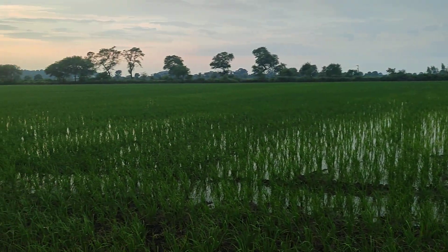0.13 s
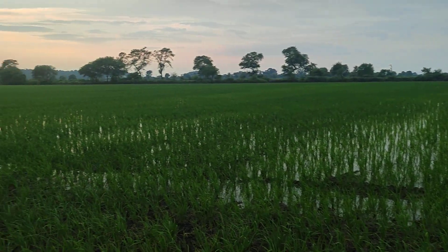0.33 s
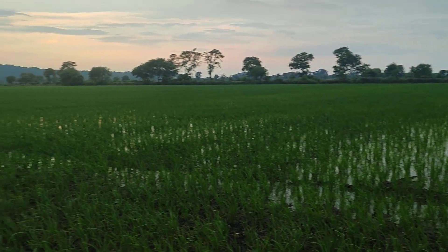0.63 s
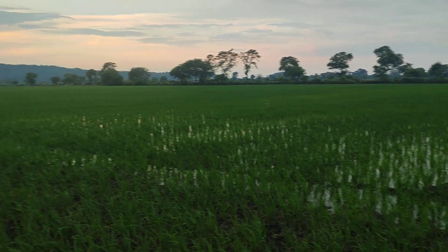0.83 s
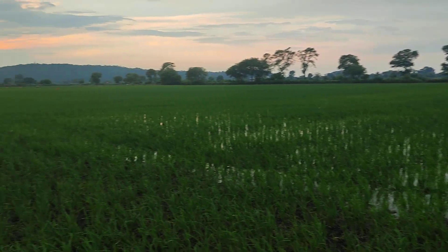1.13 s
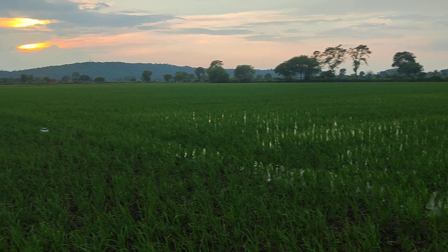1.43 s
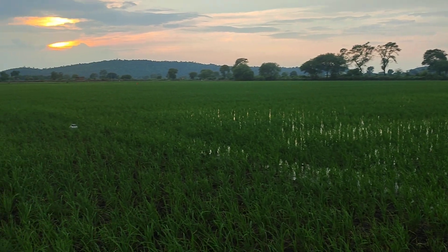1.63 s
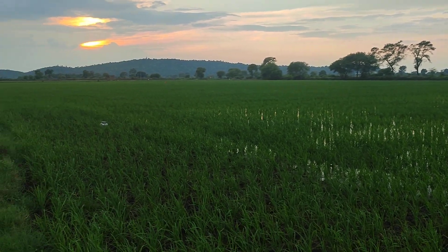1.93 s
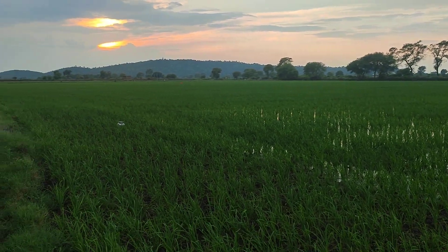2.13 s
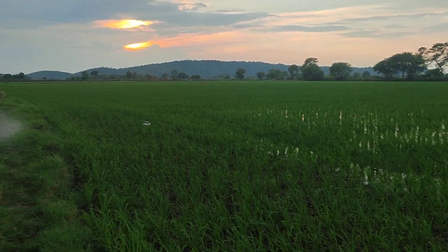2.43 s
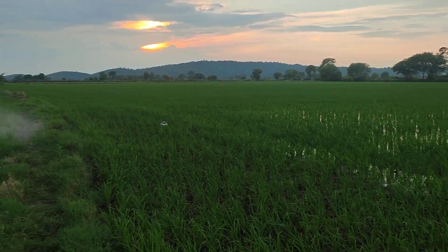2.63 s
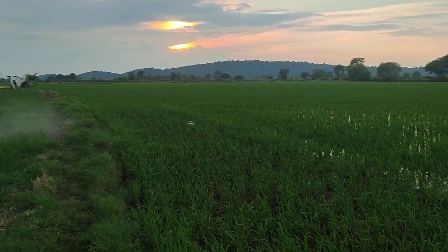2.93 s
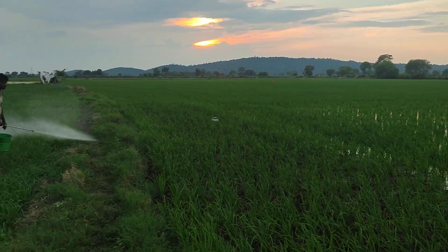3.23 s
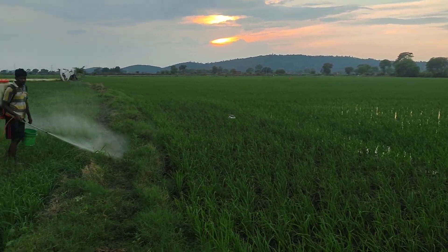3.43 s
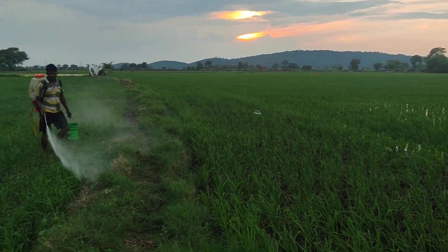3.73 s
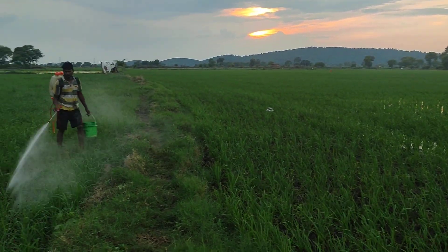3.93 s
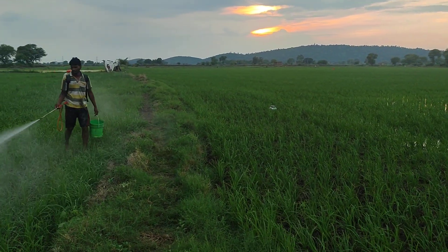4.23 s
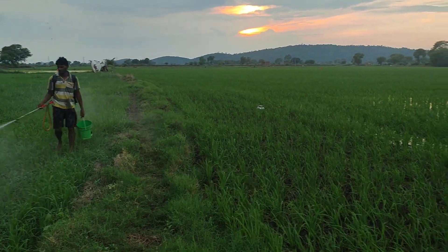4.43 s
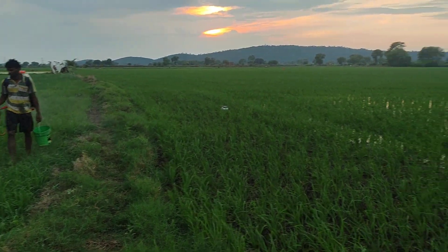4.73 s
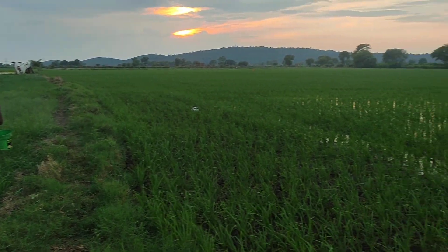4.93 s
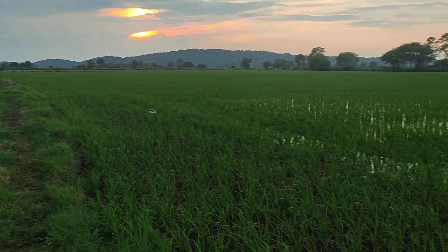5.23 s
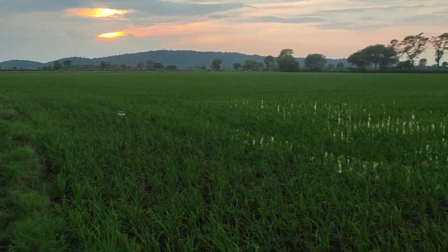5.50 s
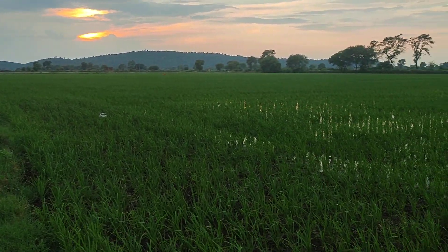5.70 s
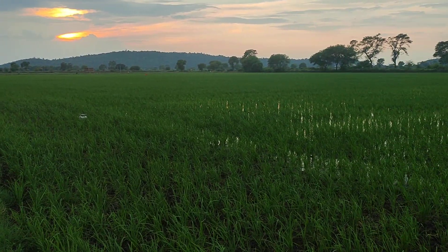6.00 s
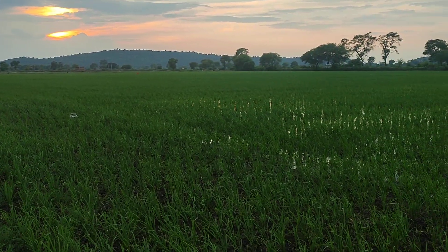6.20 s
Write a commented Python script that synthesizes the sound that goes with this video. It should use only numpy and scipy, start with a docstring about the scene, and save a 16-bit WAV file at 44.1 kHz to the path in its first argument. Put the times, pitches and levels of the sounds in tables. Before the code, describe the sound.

A hand-held stereo microphone in a breezy field catches a small engine's fast, rough purr and the fluttering hiss of its spray, with a faint metallic whine. Soft wind builds into low, blunt thumps and rumbling gusts, heaviest on the right. The spray dims past the middle and comes back weaker, over a thin, even background hiss.

```python
"""On a rice field at dusk, wind buffets a hand-held camera that pans; a thin, even hiss lies over the fields.
A farmer works a crop sprayer, heard first at the left port: engine pulses chug through their silencer,
valve knocks rasp and ring the casing, the pump whistles, and noise gated by its strokes is the jet's hiss.
The hiss fades as the jet swings away and partly returns. Shaped noise makes the rising breeze, its gusts
and brief lulls, mostly at the right port; rounded pressure peaks are the single thumping eddies."""
import sys
import numpy as np
from scipy import signal
from scipy.fft import rfft, irfft
from scipy.io import wavfile
from scipy.ndimage import uniform_filter1d, map_coordinates

SR = 44100
rng = np.random.default_rng(int(sys.argv[2]) if len(sys.argv) > 2 else 0)


def master_out(mix):
    """Clip the mix to full scale and print it as 16-bit PCM to the path in sys.argv[1]."""
    frames = np.transpose(np.atleast_2d(mix))
    ceiling = np.clip(frames, -1, 1)
    pcm = np.round(ceiling * 32767).astype(np.int16)
    wavfile.write(sys.argv[1], SR, pcm)


N = 280520
TIME, HZ = np.arange(N) / SR, np.fft.rfftfreq(N, 1 / SR)


def gain_of(db):
    """Logarithmic level: decibels to amplitude."""
    return 10 ** (np.asarray(db) / 20)


def evened(x):
    """Normalisation: scales each channel to rms 1."""
    return x / np.sqrt(np.mean(x ** 2, axis=-1, keepdims=True) + 1e-20)


def curves(rows):
    """Linear interpolation: each column of a time table, sample by sample."""
    s, *columns = np.transpose(rows)
    return [np.interp(TIME, s, column) for column in columns]


def coloured(x, points):
    """Linear filtering: applies a spectrum drawn on a log-frequency axis."""
    f, db = np.transpose(points)
    spectrum_db = np.interp(np.log(HZ + 1), np.log(f + 1), db)
    return irfft(rfft(x) * gain_of(spectrum_db), N)


def noise(channels=2):
    """Incoherence: white noise, unrelated between channels."""
    return rng.standard_normal((channels, N))


def wander(rate_hz, channels=1):
    """Low-passed randomness: smooth chance of rms 1 up to about the given rate."""
    return evened(irfft(rfft(noise(channels)) / (1 + (HZ / rate_hz) ** 4), N))


def panned(side_db):
    """Constant-power panning: gains of the left and right ports."""
    left = gain_of(side_db)
    return np.array([left, np.ones(N)]) * np.sqrt(2 / (1 + left ** 2))


# the camera pans: (time [s], lag of the right port [ms], left minus right level of the spray [dB])
CAMERA_HEADING = [(0, 0.48, -7), (1, .53, -5.5), (2, 0.51, -4.5), (3, 0.45, -4.5), (3.7, 0.35, -2.5),
                  (4.5, 0.33, -8), (5.2, 0.37, -8), (6.36, 0.54, -3)]


def arriving(direct, scattered, share, shorter_ms=0):
    """Interaural delay and diffusion: direct sound lags at the right port; crop scatter is unrelated there."""
    lag_ms, _ = curves(CAMERA_HEADING)
    delayed_samples = np.arange(N) - (lag_ms - shorter_ms) * SR / 1000
    late = map_coordinates(direct, [delayed_samples], order=3, mode="nearest")
    return np.sqrt(1 - share) * np.array([direct, late]) + np.sqrt(share) * scattered  # share of the power


def cycles(table, first_s):
    """Phase is the integral of speed: cycles run so far, zero near first_s."""
    per_s, = curves(table)
    return np.cumsum(per_s) / SR - first_s * per_s[0]


def clicks(turns, at):
    """Impulse train: one click each cycle, at the given share of the cycle."""
    return np.diff(np.floor(turns - at), prepend=np.floor(turns[0] - at))


def beats(turns, uneven_db, length):
    """Exponential decay: one puff a cycle, each of its own size; length is a share of the cycle."""
    cycle = (turns - turns.min() // 1).astype(int)
    size_db = uneven_db * rng.standard_normal(cycle[-1] + 1)
    return evened(gain_of(size_db[cycle]) * np.exp(-(turns % 1) / length))


def smeared(x, ms_per_khz):
    """Dispersion: higher partials leave later, which spreads each pulse but keeps the harmonics even."""
    return irfft(rfft(x) * np.exp(-1j * np.pi * ms_per_khz * (HZ / 1000) ** 2), N)


# hiss of the open fields: (frequency [Hz], spectral density [dB per Hz])
FIELD_SPECTRUM = [(100, 7), (400, -2.5), (700, -0.5), (900, -28), (1300, -13.5), (1800, 6.5), (2700, 4),
                  (4000, 6), (4850, 0.5), (6000, 0), (8000, -2), (10000, -7.5), (11000, -4.5),
                  (14000, -8.5)]


def field():
    """Stationary noise: the even, distant hiss of the open fields."""
    return gain_of(-39) * evened(coloured(noise(), FIELD_SPECTRUM))


# the breeze between gusts at the windward (right) port: (time [s], force [dB])
BREEZE_FORCE = [(0, -42), (.55, -43), (1, -33), (1.33, -26.5), (1.6, -28), (2.32, -27.5), (3.05, -20.5),
                (3.92, -21), (4.35, -22), (4.62, -33.5), (4.95, -29.5), (5.2, -18.5), (5.45, -22),
                (5.56, -23.5), (6.36, -22)]
# gusts: (start [s], length [s], force [dB], left minus right [dB],
# fineness [dB]: above 0 small eddies, below 0 large ones)
GUST_EVENTS = [(-.02, 0.022, -26.5, 3, -1.5), (.24, 0.022, -43, 5, -7), (.89, 0.22, -32, -4, 8.5),
               (1.14, 0.096, -37, -1, -4), (1.42, 0.075, -27.5, -11, 8.5), (1.7, .3, -33, -10, 14.5),
               (2.06, 0.21, -29, -8, 8.5), (2.378, 0.24, -29.5, -11, 13), (2.62, 0.19, -25, -15, 7.5),
               (3.229, 0.16, -15, -27, -2), (3.35, 0.034, -24, -26, 14), (3.5, 0.047, -26, 2, -7),
               (3.699, 0.059, -19.5, -3, 0), (3.998, 0.13, -18, -4.5, 0), (4.44, 0.099, -39, 12.5, -0.5),
               (4.859, 0.014, -16.5, -27, -3.5), (4.985, 0.057, -14.5, -25, 2),
               (5.26, 0.092, -25.5, -2.5, -7), (5.627, 0.41, -18.5, -17, 3.5),
               (6.0, 0.12, -20.5, -28.5, 5.5), (6.16, 0.094, -24, -3.5, -3.5)]
GUST_ATTACK_S, GUST_RELEASE_S = 0.0081, 0.04
USUAL_FORCE_DB = -26
LEE_DB, LEE_FOLLOWS = -32, 0.41  # left port at the usual force; dB gained per dB of breeze


def force(fine):
    """Power addition: breeze plus gusts at both ports, in dB over the usual; fine runs from -1 (large) to 1."""
    breeze_db, = curves(BREEZE_FORCE)
    lee_db = LEE_DB + LEE_FOLLOWS * (breeze_db - USUAL_FORCE_DB)
    power = gain_of([lee_db, breeze_db]) ** 2
    for start, length, force_db, side_db, fine_db in GUST_EVENTS:
        rise = np.clip((TIME - start) / GUST_ATTACK_S, 0, 1)
        fall = np.exp(-np.clip(TIME - start - length, 0, 1) / GUST_RELEASE_S)
        gust = gain_of(force_db + fine * fine_db) * rise * fall
        power = power + (gain_of([[side_db], [0]]) * gust) ** 2
    return 10 * np.log10(power) - USUAL_FORCE_DB


# eddies from large to small, each: (frequency [Hz], spectral density [dB per Hz])
HEAVE_SPECTRUM = [(8, -24), (20, 1), (33, 6), (50, 0.5), (70, -3.5), (120, -72), (300, -45.5)]
RUMBLE_SPECTRUM = [(20, -21), (45, -3), (62, -1.5), (100, -1.5), (150, -4.5), (190, -10.5), (260, -18.5),
                   (400, -57), (900, -61)]
FLUTTER_SPECTRUM = [(40, -35), (110, -1.5), (190, 1.5), (300, -7.5), (450, -14), (700, -30.5),
                    (1200, -31.5), (3000, -62), (9000, -83)]
# brief changes of wind at the right port, mostly drops: (time [s], half-length [s], level change [dB])
LULL_EVENTS = [(1.29, 0.052, -12), (2.295, 0.026, -2), (3.007, .025, -2), (3.44, 0.012, 2),
               (3.628, .03, -9), (3.943, 0.043, -11), (4.27, 0.025, 2.5), (4.352, 0.011, -16),
               (4.936, 0.027, -7), (5.233, 0.035, -7.5), (5.548, 0.028, -8), (5.955, 0.033, -6.5)]
# eddy sizes: (level at the usual force [dB], gain per dB of force [dB])
HEAVE_LAW, RUMBLE_LAW, FLUTTER_LAW = (-25.5, 0.88), (-27.5, 1.03), (-36.5, 1.19)
TURBULENCE_HZ, RUMBLE_SWING_DB, FLUTTER_SWING_DB = 14, 1.5, 2.3


def wind():
    """Turbulent cascade: each port feels its own eddies; small ones ride on the pressure peaks of large ones."""
    heave_db, rumble_db, flutter_db = (
        db + slope * force(fine)
        for fine, (db, slope) in [(-1, HEAVE_LAW), (0, RUMBLE_LAW), (1, FLUTTER_LAW)])
    right_db = sum(db * np.exp(-((TIME - s) / half) ** 2) for s, half, db in LULL_EVENTS)
    lull_db = np.array([[0], [1]]) * right_db
    turbulence = wander(TURBULENCE_HZ, channels=2)
    # the gust speed bounds the pressure swings
    heave = evened(np.tanh(.5 * evened(coloured(noise(), HEAVE_SPECTRUM))))
    large = evened(np.tanh(.5 * evened(coloured(noise(), RUMBLE_SPECTRUM))))
    riding = gain_of(1.3 * large + wander(52, channels=2))
    small = evened(coloured(noise(), FLUTTER_SPECTRUM) * riding)
    heave_gain = gain_of(heave_db + .5 * lull_db)
    rumble_gain = gain_of(rumble_db + lull_db + heave + RUMBLE_SWING_DB * turbulence)
    flutter_gain = gain_of(flutter_db + lull_db + FLUTTER_SWING_DB * turbulence)
    return heave_gain * heave + rumble_gain * large + flutter_gain * small


# the sprayer as its lance swings: (time [s], jet hiss [dB], casing clatter [dB]), both relative
LANCE_LEVELS = [(0, -34, -45), (0.75, -34, -49.5), (1.2, -33.5, -35), (2.0, -34, -34), (2.65, -33.5, -36.5),
                (3.4, -38.5, -35.5), (4.0, -46, -47), (4.5, -55.5, -68), (5.1, -55, -42.5),
                (5.7, -47.5, -41.5), (6.36, -42.5, -37)]
FACING_DB = -34  # table level of the jet when it faces the camera
JET_DB, FIZZ_DB, CASING_DB = -27.5, -33.5, 1  # hiss and fizz when facing; offset of the casing
HISS_FALL, FIZZ_FALL = 1.01, 0.81  # dB per dB of the jet's swing


def spraying():
    """Directivity: levels of casing clatter, jet hiss and droplet fizz in dB as the lance swings."""
    jet_db, casing_db = curves(LANCE_LEVELS)
    away_db = jet_db - FACING_DB
    return casing_db + CASING_DB, JET_DB + HISS_FALL * away_db, FIZZ_DB + FIZZ_FALL * away_db


def gated_hiss(gate, spectrum, scatter):
    """Amplitude modulation: noise opened by a gate and coloured, as it arrives from the machine."""
    sound = evened(coloured(noise(channels=3) * gate, spectrum))
    return arriving(sound[0], sound[1:], scatter)


# casing, jet and droplets, each: (frequency [Hz], spectral density [dB per Hz])
CLATTER_SPECTRUM = [(900, -51), (1250, -8), (1480, 9), (1680, 14), (1900, 7), (2150, 8), (2400, 4),
                    (2800, -45), (4000, -44)]
JET_SPECTRUM = [(1500, -13.5), (2300, 1), (2600, 1), (3100, 6), (3400, -3.5), (3900, 0.5), (4400, -0.5),
                (4850, -3), (5400, 1), (6000, -0.5), (6550, -18), (7200, -20), (9000, -85)]
FIZZ_SPECTRUM = [(4500, -49), (6300, 0), (7500, 3), (8500, -3), (9400, -1.5), (10200, -13), (10900, 2),
                 (12000, -18), (14300, -14)]
JET_SURGE, CLATTER_SURGE, FIZZ_SURGE = .35, .12, .38  # depth of the pump strokes


def sprayer(engine_turns, strokes):
    """Modulated turbulence: casing clatters with the firings; jet and droplets surge at every pump stroke."""
    clatter_db, hiss_db, fizz_db = spraying()
    knocks = beats(engine_turns - .38, uneven_db=1.5, length=.12)
    surges = beats(strokes, uneven_db=1.4, length=.12)
    sputter = gain_of(1.5 * wander(36)[0])
    clatter = gated_hiss(1 + .4 * knocks + CLATTER_SURGE * surges, CLATTER_SPECTRUM, scatter=.18)
    hiss = gated_hiss(1 + JET_SURGE * surges + .15 * knocks, JET_SPECTRUM, scatter=.2)
    fizz = gated_hiss(sputter * (1 + FIZZ_SURGE * surges), FIZZ_SPECTRUM, scatter=.48)
    return clatter * gain_of(clatter_db) + hiss * gain_of(hiss_db) + fizz * gain_of(fizz_db)


# four valve knocks in each engine cycle: (share of the cycle [1], ring [dB], rasp [dB])
VALVE_KNOCKS = [(.147, -7, -3), (.413, -3, 0), (.68, 0, -3), (.947, -16, -2)]
# resonance of the casing near 2.1 kHz: (frequency [Hz], level [dB])
RING_SPECTRUM = [(1750, -39), (1960, -35), (2060, 8), (2140, -0.5), (2200, 7), (2290, -13.5), (2450, -32)]
# loudness of that resonance: (time [s], level [dB])
RING_LEVEL = [(0, -44), (.3, -35.5), (.75, -30), (1.1, -33), (1.4, -67), (2.1, -57), (2.7, -38),
              (3.25, -32.5), (3.7, -37.5), (4.3, -48.5), (4.8, -51), (5.5, -40.5), (6.36, -44.5)]
# dry rasp of the valves: (frequency [Hz], level [dB])
RASP_SPECTRUM = [(1200, -30), (1420, 3), (1900, -37), (2500, 3), (3000, -3.5), (3500, 6.5), (4300, -15),
                 (4900, -4), (6500, -10)]
RASP_UNDER_JET_DB, RASP_DECAY_S, RASP_DRIFT_HZ = -7.5, .0013, .35


def valves(turns):
    """Impact excitation: knocks ring the casing into a whine and rasp, in a colour that drifts as the farmer moves."""
    impacts = sum(gain_of(db) * clicks(turns, at) for at, db, _ in VALVE_KNOCKS)
    ring = evened(coloured(impacts, RING_SPECTRUM))
    decay = np.exp(-TIME[TIME < 6 * RASP_DECAY_S] / RASP_DECAY_S)
    drift, rasp = 2 * np.pi * RASP_DRIFT_HZ * TIME, 0
    for at, _, db in VALVE_KNOCKS:
        knocks = clicks(turns, at) * gain_of(db + 1.5 * rng.standard_normal(N))
        for blend in np.cos(drift), np.sin(drift):  # crossfades two random responses
            response = decay * rng.standard_normal(len(decay))
            rasp = rasp + signal.oaconvolve(knocks * blend, response)[:N]
    ring_db, = curves(RING_LEVEL)
    _, hiss_db, _ = spraying()
    rasp = evened(coloured(rasp, RASP_SPECTRUM)) * gain_of(hiss_db + RASP_UNDER_JET_DB)
    return arriving(ring * gain_of(ring_db) + rasp, 0, share=0)


# whistles of the pump: (frequency [Hz], relative level [dB])
PUMP_WHISTLES = [(1957, -7.5), (2272, 7.5), (2808, 4), (3951, -0.5), (4278, 2)]


def whistles(strokes):
    """Additive synthesis: thin pump tones drift together, flicker one by one and throb with the jet."""
    clock = TIME + .0022 * np.cumsum(wander(2.56)[0]) / SR
    lines = 0
    for hz, db in PUMP_WHISTLES:
        flicker = 1 + .5 * wander(29)[0]
        lines = lines + gain_of(db) * flicker * np.cos(2 * np.pi * (hz * clock + rng.random()))
    _, hiss_db, _ = spraying()
    throb = evened(1 + .7 * beats(strokes, uneven_db=1.5, length=.25))
    return arriving(lines, 0, share=0) * throb * gain_of(hiss_db - 15)


# the exhaust: (time [s], thrum [dB], growl [dB], bark [dB], ring of the pipe [dB])
EXHAUST_LEVELS = [(0, -40.5, -44.5, -46, -68), (.9, -38, -42, -63, -50.5), (1.5, -35.5, -45.5, -50, -46.5),
                  (2.0, -35.5, -47, -44.5, -42.5), (2.6, -51, -48, -39.5, -42.5),
                  (3.2, -49, -47.5, -41, -44), (4.5, -44.5, -56, -46.5, -55), (5, -37, -63, -41, -52),
                  (5.6, -54, -54, -39.5, -47), (6.36, -53, -52, -40, -50)]
# parts of the exhaust, each: (frequency [Hz], level [dB])
THRUM_SPECTRUM = [(35, 2), (82, 18.5), (122, 3), (163, 3), (204, 14.5), (245, 5), (290, -9), (400, -25),
                  (600, -53)]
GROWL_SPECTRUM = [(380, -37), (450, -12), (490, 13), (570, 4), (620, 16), (690, 8.5), (760, 4), (850, -11),
                  (950, -45)]
BARK_SPECTRUM = [(560, -65), (690, -13), (740, 4.5), (830, 4), (930, 9), (1020, 3), (1200, -17.5),
                 (1450, -3.5), (1900, -7.5), (3000, -30.5)]
PIPE_SPECTRUM = [(880, -62), (970, -5), (1040, 22), (1100, 7.5), (1200, -27.5)]
# echoes off the bank and the wet ground: (delay [ms], level [dB])
EXHAUST_ECHOES = [(2.6, -15), (7.5, -12), (17.5, -11)]


def engine(turns):
    """Source and filter: firing pulses become thrum, growl, bark near 800 Hz and pipe ring, plus gas noise."""
    thrum_db, growl_db, bark_db, pipe_db = curves(EXHAUST_LEVELS)
    pulses = clicks(turns, at=.05) * gain_of(1.5 * wander(22)[0])
    # the echoes soften the gaps between firings
    pulses = pulses + sum(gain_of(db) * np.roll(pulses, round(ms * SR / 1000)) for ms, db in EXHAUST_ECHOES)
    blended, sharp = smeared(pulses, ms_per_khz=55), smeared(pulses, ms_per_khz=9)
    parts = [(blended, THRUM_SPECTRUM, thrum_db), (blended, GROWL_SPECTRUM, growl_db),
             (sharp, BARK_SPECTRUM, bark_db), (sharp, PIPE_SPECTRUM, pipe_db)]
    chug = sum(evened(coloured(x, spectrum)) * gain_of(db) for x, spectrum, db in parts)
    gas = noise() * beats(turns, uneven_db=0.5, length=0.99)
    bark_gas = evened(coloured(gas, BARK_SPECTRUM)) * gain_of(bark_db)
    pipe_gas = evened(coloured(gas, PIPE_SPECTRUM)) * gain_of(pipe_db)
    return arriving(chug, bark_gas + pipe_gas, share=.12, shorter_ms=.02)


# single eddies that strike the ports:
# (time [s], low thump [dB], slap [dB], rustle [dB], left minus right [dB])
EDDY_STRIKES = [(0.026, -20, -37, -52, 4), (0.884, -25, -31, -59, -10), (1.035, -18, -27, -51, -21),
                (1.165, -30, -26, -59, -2), (1.241, -20, -31, -55, 17), (1.45, -14, -27.5, -57, -6),
                (1.841, -24, -22, -48, -4), (1.945, -22, -21, -36, -6), (2.08, -19, -22.5, -47.5, -13),
                (2.19, -12, -26, -50, -19), (2.233, -18, -19, -46, -20), (2.53, -18, -32, -50, -2),
                (2.568, -11, -23, -44, 1), (2.691, -20, -16.5, -36, -32), (2.859, -10, -23, -54, -20),
                (3.036, -15, -28, -47, -10), (3.268, -17, -26, -48, -20), (3.359, -28, -18, -25, -29),
                (3.399, -13.5, -24.5, -48, -22), (3.489, -11, -17.5, -46, -20), (3.517, -3, -32, -50, -18),
                (3.566, -28, -18.5, -31, -9.5), (3.622, -12.5, -21, -50, 12), (3.725, -21, -26.5, -48, -22),
                (3.764, -13, -28, -52, 12), (3.902, -21, -28, -57, -12), (4.027, -12, -20, -22, -13),
                (4.073, -19, -9, -18.5, -14), (4.119, -3.5, -39, -50, -8), (4.197, -8, -20.5, -42, -10),
                (4.311, -21, -18.5, -24, -16), (4.385, -6, -23, -40, -18), (4.431, -16, -38, -55, 16),
                (4.559, -18, -36, -55, 7), (4.737, -12.5, -32.5, -56, 14), (4.889, -9, -21.5, -45, -23),
                (4.999, -7, -17.5, -36, -33), (5.02, -9, -14.5, -52, -24), (5.12, -9.5, -16, -32, -26),
                (5.71, -4, -17.5, -49, -16), (5.787, -5, -15, -52, -22), (5.863, -14, -28, -44, -18),
                (6.013, -8, -33, -54, -33), (6.042, -21, -34, -58, -22), (6.115, -8, -13, -32, -23),
                (6.134, -20, -15, -34, -21), (6.166, -11, -18, -29, -4), (6.245, -12, -24, -50, -15)]
# small eddies of a strike, each: (frequency [Hz], spectral density [dB per Hz])
SLAP_SPECTRUM = [(90, -15), (200, 8.5), (320, -0.5), (480, -10.5), (700, -27)]
RUSTLE_SPECTRUM = [(350, -1), (520, 3), (700, -5.5), (900, -14.5), (1300, -20), (2000, -22), (5000, -55)]
THUMP_S, SLAP_S = .0048, .0095


def buffets():
    """Vortex impact: a rounded pressure peak, opposite lobes either side, with a slap and a rustle on top."""
    # the eddy's speed bounds the pressure
    slaps = evened(np.tanh(2 * evened(coloured(noise(), SLAP_SPECTRUM))))
    slaps = evened(coloured(slaps, [(500, 0), (800, -12), (1400, -30), (4000, -60)]))
    rustle = evened(coloured(noise(), RUSTLE_SPECTRUM))
    out = np.zeros((2, N))
    for s, thump_db, slap_db, rustle_db, side_db in EDDY_STRIKES:
        near = np.flatnonzero(abs(TIME - s) < 4 * SLAP_S)
        t = TIME[near] - s
        thump = (1 - 2 * (t / THUMP_S) ** 2) * np.exp(-(t / THUMP_S) ** 2)
        thump = gain_of(thump_db) * thump * rng.choice([-1, 1], (2, 1))  # either sign at each port
        burst = gain_of(slap_db) * slaps[:, near] + gain_of(rustle_db) * rustle[:, near]
        ports = gain_of([[min(side_db, 0)], [min(-side_db, 0)]])
        out[:, near] += ports * (thump + burst * np.exp(-(t / SLAP_S) ** 2))
    return out


STALL_DB = -2.5


def stalled(pressure):
    """Saturation: the air speed bounds the pressure at a port, which rounds the highest peaks."""
    return gain_of(STALL_DB) * np.tanh(pressure / gain_of(STALL_DB))


# a sharp tick in the spray: (time [s], level at its peak [dB])
SPRAY_TICKS = [(2.963, -20)]


def ticks():
    """Transient noise: a brief, wide tick with a glint near 8 kHz, stronger on the left."""
    swell = sum(gain_of(db) * np.exp(-abs(TIME - s - .002) / .0016) for s, db in SPRAY_TICKS)
    ring = coloured(noise(), [(1000, -20), (1700, -2), (3000, -2), (4500, -4), (6500, -11),
                              (7900, -1), (8600, -12), (12000, -20)])
    return gain_of([[1], [-2]]) * evened(ring) * swell


# a band of the spray that slides as the camera turns: (time [s], centre frequency [Hz], level [dB])
SLIDING_HUMP = [(0, 3330, 1.5), (.8, 2920, -4.5), (1.1, 3160, 8.5), (1.45, 3050, 7.5), (1.6, 3200, 4),
                (1.65, 4170, 4.5), (1.8, 4140, 4.5), (2.4, 3900, 7), (3, 3670, 5.5), (3.7, 3900, 4),
                (4.2, 3330, 11), (4.7, 3450, -14), (5.7, 3640, 12), (6.36, 3400, 3.5)]


def turning(sound):
    """Interference: reflections near the camera raise or lower a sliding band; the hiss flickers in patches."""
    hump_hz, hump_db = curves(SLIDING_HUMP)
    hz, s, z = signal.stft(sound, SR, nperseg=512)
    octaves = np.log2((hz[:, None] + 1) / np.interp(s, TIME, hump_hz))
    lift_db = np.interp(s, TIME, hump_db) * np.exp(-(octaves / 0.12) ** 2)
    patches = uniform_filter1d(rng.standard_normal(z.shape[1:]), size=5, axis=0)
    patches = evened(uniform_filter1d(patches, size=14, axis=1))
    patchy_db = np.interp(hz, [2000, 10000], [1.2, 2.4])[:, None]
    # the whole spray sits 3 dB lower
    return signal.istft(z * gain_of(lift_db + patchy_db * patches - 3), SR)[1][:, :N]


# reflections that reshape two bands of the hiss: (time [s], lower band [dB], upper band [dB])
HOLLOW_LEVELS = [(0, 6, -7), (.6, 5, 7.5), (1.25, -16, 3), (2, -21, -4), (2.6, 6, 4), (3.1, 10, -9),
                 (3.7, 15, 3), (4.3, 15, -27), (4.8, 10, -6), (5.3, 9, 1), (6.36, -6, -7)]
HOLLOW_HZ, HOLLOW_OCTAVES = (1260, 1820), (0.18, 0.089)


def hollowed(sound):
    """Comb-like interference: two narrow bands of the hiss sink and swell as the camera turns."""
    hz, s, z = signal.stft(sound, SR, nperseg=1024)
    change_db = 0
    for db, centre_hz, width in zip(curves(HOLLOW_LEVELS), HOLLOW_HZ, HOLLOW_OCTAVES):
        octaves = np.log2((hz[:, None] + 1) / centre_hz)
        change_db = change_db + np.interp(s, TIME, db) * np.exp(-(octaves / width) ** 2)
    return signal.istft(z * gain_of(change_db), SR)[1][:, :N]


# speed of the engine: (time [s], firing rate [1/s])
ENGINE_SPEED = [(0, 40.55), (1.1, 40.78), (2.2, 40.7), (3.2, 40.9), (4.6, 40.55), (5.4, 40.78),
                (6.36, 40.95)]
# speed of the pump: (time [s], stroke rate [1/s])
PUMP_SPEED = [(0, 43.71), (.5, 43.85), (.85, 44.15), (1.2, 43.85), (2.5, 43.85), (3.5, 44.23),
              (3.75, 43.95), (4, 43.15), (4.25, 43.85), (5.2, 43.85), (6.36, 44.25)]
FIRST_FIRING_S, FIRST_STROKE_S = .015, .0013


def scene():
    """Superposition: the sprayer, the fields all round and the wind on the ports."""
    engine_turns, strokes = cycles(ENGINE_SPEED, FIRST_FIRING_S), cycles(PUMP_SPEED, FIRST_STROKE_S)
    _, side_db = curves(CAMERA_HEADING)
    machine = sprayer(engine_turns, strokes) + valves(engine_turns) + whistles(strokes)
    spray = panned(side_db) * turning(machine)
    return hollowed(spray + field()) + engine(engine_turns) + ticks() + stalled(wind() + buffets())


# treble colour of each microphone port: (frequency [Hz], level [dB])
LEFT_PORT_RESPONSE = [(1000, -2), (5000, -2.5), (6500, -1), (7300, 7), (8000, 7.5), (9000, 0),
                      (14000, -3.5)]
RIGHT_PORT_RESPONSE = [(1000, -1.5), (5000, -3), (6500, -5.5), (7300, -1.5), (8000, -4), (9000, -5),
                       (14000, -8.5)]
EDGE_HZ = 14250


def record(dry):
    """Transducer response: each microphone port has its own treble colour; then a low-pass band limit."""
    ports = np.array([coloured(dry[0], LEFT_PORT_RESPONSE), coloured(dry[1], RIGHT_PORT_RESPONSE)])
    low_pass = signal.firwin(2047, EDGE_HZ, window=("kaiser", 9), fs=SR)
    return signal.oaconvolve(ports, low_pass[None], "same")


dry = scene()
out = record(dry)
master_out(out)
```